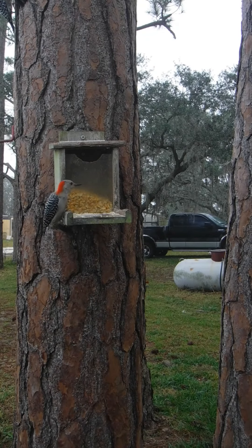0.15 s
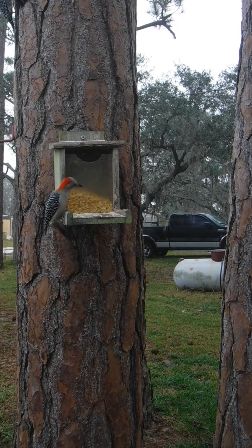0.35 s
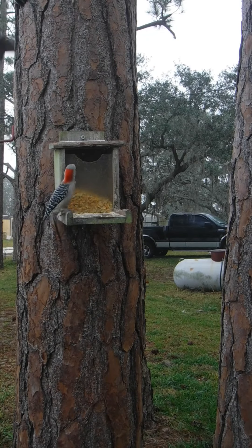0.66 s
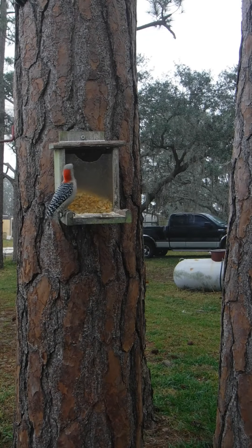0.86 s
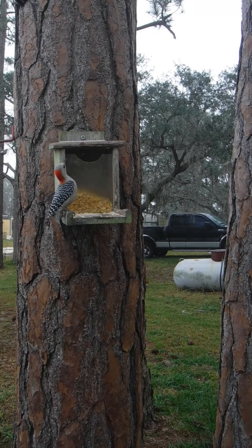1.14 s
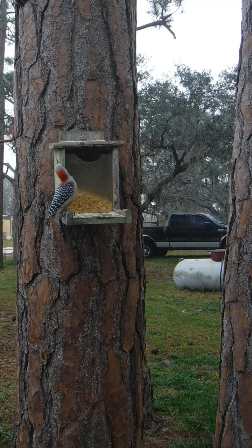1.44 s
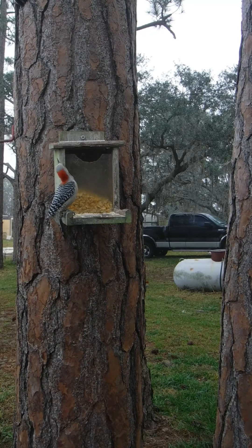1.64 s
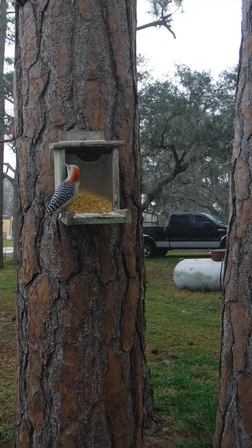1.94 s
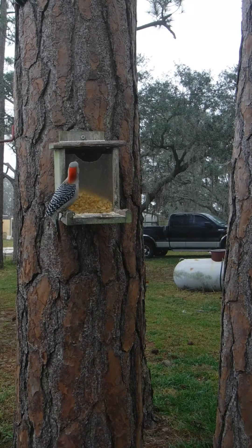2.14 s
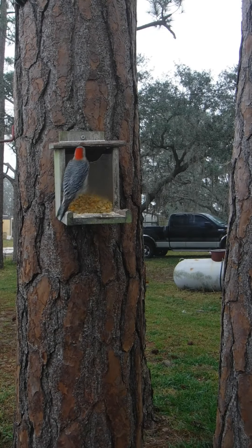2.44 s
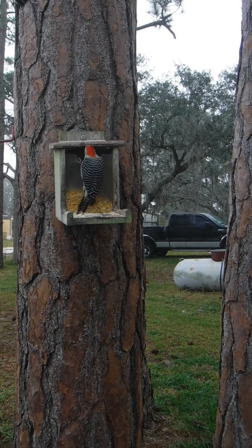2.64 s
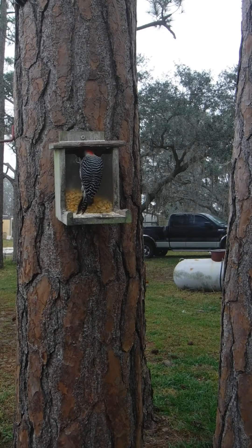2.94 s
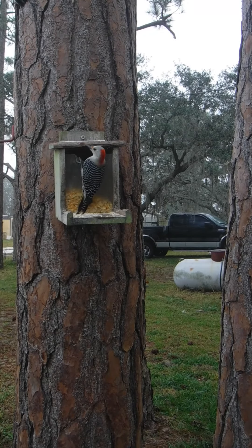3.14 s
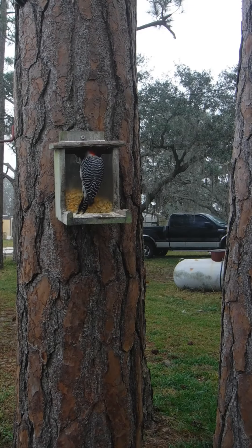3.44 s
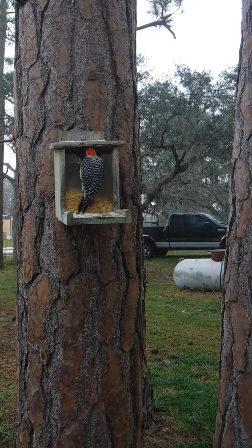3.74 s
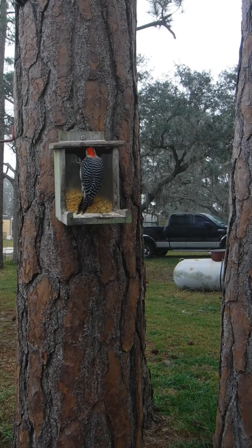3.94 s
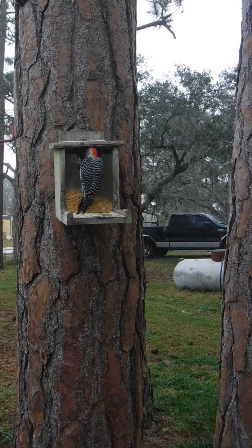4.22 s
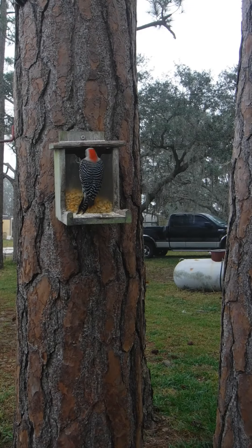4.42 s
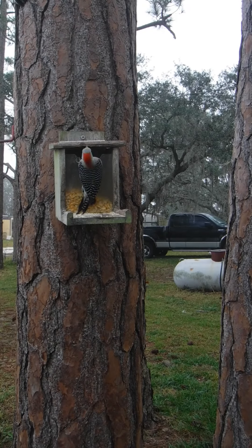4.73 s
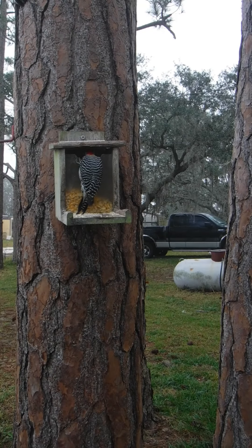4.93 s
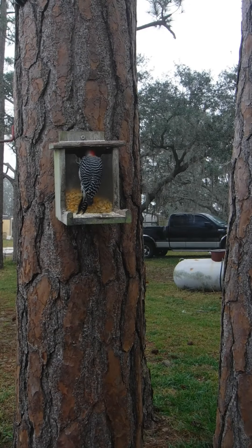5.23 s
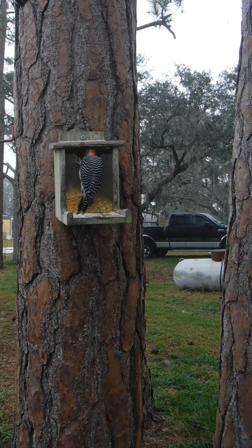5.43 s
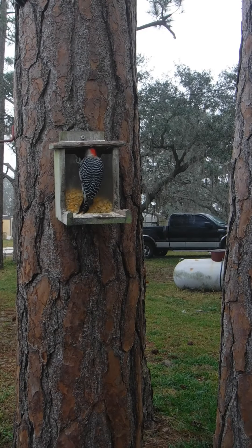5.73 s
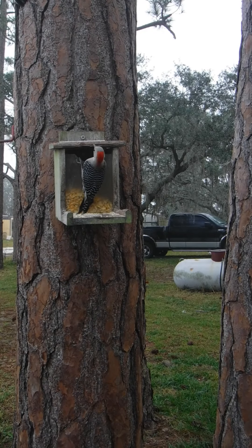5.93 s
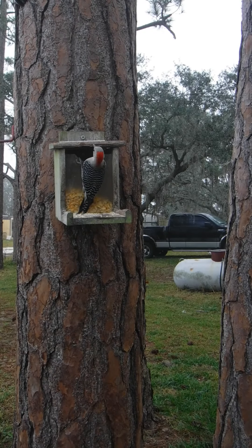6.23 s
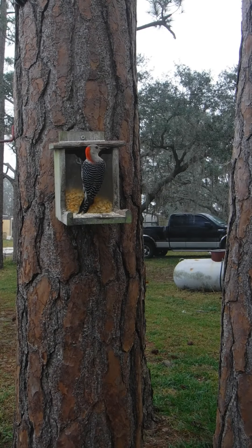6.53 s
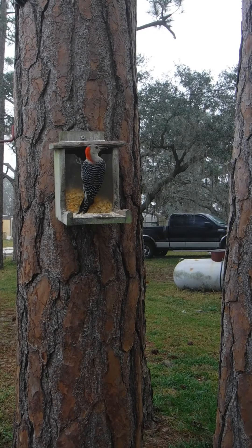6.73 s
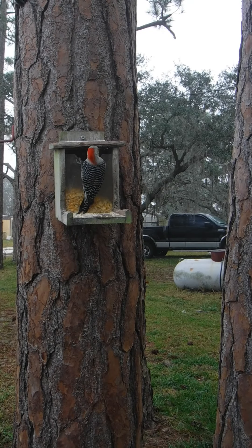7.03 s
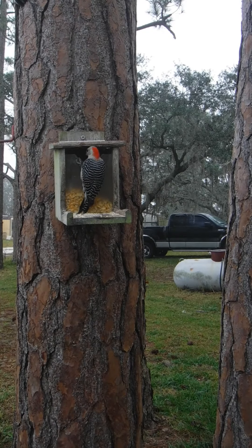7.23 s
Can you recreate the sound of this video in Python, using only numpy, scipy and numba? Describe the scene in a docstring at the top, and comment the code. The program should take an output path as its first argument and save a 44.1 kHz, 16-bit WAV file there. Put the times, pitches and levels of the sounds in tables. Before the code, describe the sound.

A woodpecker close by gives harsh, barking 'chah' calls in small groups, its claws ticking on a wooden feeder, with thin birdsong over quiet outdoor air.

```python
"""In a yard, a red-bellied woodpecker at a wooden feeder box on a pine, close to the microphone, gives eight 'chah'
calls: rough membrane pulses through throat and beak resonances, a bark that may whistle, then a low rattling growl.
Claws and beak tick on the wood: scratches of noise ring the box. Further off, a small bird sings thin falling 'seet'
notes with two gliding tones; faint slurred tones chirp in the trees and resonant noise makes far calls.
A machine hums in steady tones under the quiet air, which is shaped noise."""
import sys
import numpy as np
from scipy import signal
from scipy.fft import rfft, irfft
from scipy.io import wavfile
from scipy.ndimage import uniform_filter1d
from numba import njit

SR = 44100
rng = np.random.default_rng(int(sys.argv[2]) if len(sys.argv) > 2 else 0)


def log_audio(samples):
    """Write samples as a 16-bit WAV file to the path given in sys.argv[1]."""
    # one column per channel
    frames = np.atleast_2d(samples).T
    # limit to full scale, then quantise
    limited = np.clip(frames, -1, 1)
    pcm = np.round(limited * 32767).astype(np.int16)
    wavfile.write(sys.argv[1], SR, pcm)


N = 325017
TOP_HZ = 15800  # top of the microphone path and of the pulse trains


def undb(db):
    """Decibels to gain."""
    return 10 ** (np.asarray(db) / 20)


def unit(x):
    """Scale to rms 1."""
    return x / np.sqrt(np.mean(x ** 2) + 1e-20)


def steady(x, size=220):
    """Even out the loudness over a few milliseconds, to rms 1."""
    power = uniform_filter1d(uniform_filter1d(x ** 2, size), size // 2)
    return x / np.sqrt(np.abs(power) + 1e-14)


def walk(rate_hz, n):
    """Smooth random drift with a spread near 1, heading for a new value rate_hz times a second."""
    at = np.arange(n) / SR * rate_hz
    return 1.2 * np.interp(at, np.arange(4096), rng.standard_normal(4096))


def ramp(x):
    """Hold a control between 0 and 1."""
    return np.clip(x, 0, 1)


def bell(t, width_s):
    """A flat-topped window: 1 around t = 0, fallen to 1/e at its width."""
    return np.exp(-(t / width_s) ** 4)


def phase(hz):
    """Running phase in radians of a tone whose pitch moves."""
    return 2 * np.pi * np.cumsum(hz) / SR


@njit
def svf(x, hz, width):
    """State-variable band-pass whose centre and width move."""
    y, band_state, low_state = np.empty(len(x)), 0., 0.
    for i in range(len(x)):
        g = np.tan(np.pi * hz[i] / SR)
        damping = width[i] / hz[i]
        v = (band_state + g * (x[i] - low_state)) / (1 + g * (g + damping))
        band_state = 2 * v - band_state
        low_state += 2 * g * v
        y[i] = damping * v
    return y


def resonate(x, hz, width):
    """One resonance, gain 1 at its centre."""
    centre_hz = np.minimum(hz, SR * 9 / 20) * np.ones(len(x))
    return svf(x, centre_hz, width * np.ones(len(x)))


def steep(x, hz, width):
    """A resonance applied twice: dark valleys and a longer ring."""
    return resonate(resonate(x, hz, width), hz, width)


def ring(x, modes):
    """A bank of resonances sounding side by side."""
    return sum(undb(db) * resonate(x, hz, width) for hz, width, db in modes)


def band(x, lo_hz, hi_hz, order=3):
    """Band-pass with steep edges."""
    edges = [lo_hz, min(hi_hz, SR / 2 - 500)]
    return signal.sosfilt(signal.butter(order, edges, "band", fs=SR, output="sos"), x)


def add(out, start_s, x):
    """Mix a sound in at its time."""
    i = int(start_s * SR)
    out[i:i + len(x)] += x[:N - i]


def yard(level_db=-48.5, flicker_db=1.5):
    """Soft outdoor air, shaped noise; bands up to 2 kHz stir a little, the hiss above stays smooth."""
    # spectrum of the air: pitch_hz, relative density_db (per Hz)
    air_spectrum = [(15, -43), (25, -13.5), (62, -8), (91, -17.5), (122, -9.5), (140, -22.5), (152, -6),
                    (169, -6.5), (198, -10), (340, -7.5), (598, -14.5), (782, -14.5), (1380, -17),
                    (2630, -26.5), (15500, -34)]
    f = np.fft.rfftfreq(N, 1 / SR) + 1
    hz, db = np.transpose(air_spectrum)
    shape = undb(np.interp(np.log(f), np.log(hz), db))
    air = unit(irfft(rfft(rng.standard_normal(N)) * shape, N))
    for lo_hz, hi_hz in ((220, 750), (500, 600), (1000, 2000)):
        part = irfft(rfft(air) * ((f > lo_hz) & (f < hi_hz)), N)
        air = air + part * (undb(flicker_db * walk(6, N)) - 1)
    return undb(level_db) * air


def hum(drift_hz=1.63, whine_hz=13720, whine_db=-74):
    """Steady machine tones that waver on their way through the air, and a very faint high whine."""
    # tones of the distant machine: pitch_hz, level_db (rms), waver_db (spread; its sign only flips the drift)
    machine_tones = [(58.6, -80, 4.5), (127, -71.5, 3.5), (170.8, -55.5, 2.4), (342.6, -64, -3)]
    tones = np.zeros(N)
    for hz, db, waver_db in machine_tones:
        level = undb(db + waver_db * walk(14, N))
        tones += level * np.sin(phase(hz + drift_hz * walk(14, N)))
    whine = undb(whine_db) * np.sin(2 * np.pi * whine_hz * np.arange(N) / SR)
    return np.sqrt(2) * (tones + whine)


def far_calls(width_hz=170):
    """Another bird, very far off: hoarse calls of which only the strongest resonance carries this far."""
    # far calls: start_s, length_s, level_db (rms), pitch_hz
    distant_notes = [(4.234, 0.16, -60, 1380), (4.566, 0.13, -62, 1340), (4.951, 0.24, -66, 1370)]
    out = np.zeros(N)
    for start, length, db, hz in distant_notes:
        n = int(length * SR)
        hoarse = steep(rng.standard_normal(n), hz, width_hz)
        add(out, start, undb(db) * unit(np.sqrt(np.hanning(n)) * hoarse))
    return out


def chirps():
    """Faint chirps from the trees: quick slurs of a pure tone that swell and fade."""
    # chirps: start_s, length_s, start_hz, end_hz, level_db (the crest peaks 6 dB above it)
    slurs = [(3.083, 0.019, 5850, 4480, -58), (3.118, 0.02, 3260, 4130, -59),
             (3.243, .014, 5800, 4900, -61)]
    out = np.zeros(N)
    for start, length, start_hz, end_hz, db in slurs:
        n = int(length * SR)
        tone = np.sin(phase(np.linspace(start_hz, end_hz, n)))
        add(out, start, undb(db) * 2 * np.hanning(n) * tone)
    return out


def small_bird(upper_db=1.0, overtone_db=-19, undertone_db=-15, upper_scoop=0.38):
    """Two thin, hoarse whistles, one from each side of the syrinx, scoop up and glide down side by side."""
    # seet notes: start_s, length_s, rise_s (to the top), glide_s (half of the way down), lower_top_hz,
    # lower_end_hz, upper_top_hz, upper_end_hz (the ends are approached), level_db (lower voice, before the fade)
    seet_notes = [(2.566, 0.23, 0.013, 0.06, 7950, 6240, 9200, 8250, -49.5),
                  (4.139, 0.22, 0.035, 0.076, 8100, 6440, 9000, 8100, -41.5),
                  (4.598, 0.11, 0.0019, 0.0097, 8700, 7030, 9960, 7800, -50)]
    scoop_s, attack_s = 0.067, 0.006  # scoop_s: time to rise an octave to the top
    fade_depth_db, fade_shape = 14.5, 1.57
    waver, hoarse = 0.0065, 0.24  # random share of pitch and of amplitude
    out = np.zeros(N)
    for start, length, rise, glide, lower_top, lower_end, upper_top, upper_end, db in seet_notes:
        n = int(length * SR)
        t = np.arange(n) / SR
        scoop = (np.minimum(t - rise, 0) / scoop_s) ** 2
        height = 1 / (1 + (np.maximum(t - rise, 0) / glide) ** 2)
        lower_hz = (lower_end + height * (lower_top - lower_end)) * 2 ** -scoop
        upper_hz = (upper_end + height * (upper_top - upper_end)) * 2 ** (-upper_scoop * scoop)
        fade_db = -fade_depth_db * (t / length) ** fade_shape
        gate = ramp(np.minimum(t, length - t) / attack_s)
        lower = phase(lower_hz * (1 + waver * walk(1540, n)))
        upper = phase(upper_hz * (1 + waver * walk(1540, n)))
        # the upper voice drops out as the note softens
        upper_gain = undb(upper_db + 0.84 * fade_db + 3 * walk(110, n))
        voice = np.sin(lower) + upper_gain * np.sin(upper)
        # period doubling and tripling add faint partials above and below
        voice += undb(overtone_db) * np.sin(3 / 2 * lower)
        voice += undb(undertone_db) * np.sin(2 / 3 * upper)
        level = np.sqrt(2) * gate * undb(db + fade_db)
        add(out, start, level * voice * (1 + hoarse * walk(2900, n)))
    return out


def claws(size=4000):
    """Claws and beak on the box: each touch is a short gritty scratch that also knocks the wood."""
    # touches: start_s, tick_db (scratch before its band-pass), knock_db (15.5 dB is added below),
    # length_s (decay to 1/e)
    touches = [(0.251, -46, -54, 0.0035), (0.3694, -53, -49, 0.0026), (0.415, -49, -67, 0.0073),
               (2.438, -43, -50.5, 0.0035), (2.453, -38, -55, 0.0034), (2.46, -41.5, -66, 0.018),
               (2.498, -35, -60, 0.0029), (3.2557, -46, -55, 0.002)]
    # modes of the box: pitch_hz, width_hz, gain_db
    box_modes = [(860, 160, 14.5), (1530, 190, -6), (3300, 250, -3)]
    out = np.zeros(N)
    t = np.arange(size) / SR
    for start, tick_db, knock_db, length in touches:
        grit = undb(6.4 * walk(1350, size))
        scratch = rng.standard_normal(size) * grit * np.exp(-t / length)
        tick = undb(tick_db) * band(scratch, 5400, 13000, order=2)
        knock = undb(knock_db + 15.5) * ring(scratch, box_modes)
        add(out, start, tick + knock)
    return out


def pulses(cycle, hz, count=56):
    """Band-limited pulse train of rms 1, one pulse a cycle."""
    k = np.arange(1, count + 1)[:, None]
    return unit(np.sum((k * hz < TOP_HZ) * np.cos(2 * np.pi * k * cycle), axis=0))


def syrinx(hz, rough, whistle, jitter=0.0778, shimmer_db=4, hiss=1.0, whistle_jitter=0.039, second_side=2.2):
    """Uneven slaps of the membranes with a puff of air each; driven hard, they lock at three times the rate."""
    n = len(hz)
    # in rough stretches the second side of the syrinx joins in, out of step with the first
    cycle, other = (rng.random() + np.cumsum(hz * (1 + jitter * rough * walk(450, n))) / SR for _ in range(2))
    slaps = unit(pulses(cycle, hz) + second_side * rough * pulses(other, hz))
    slaps = slaps * undb(shimmer_db * rough * walk(492, n))
    air = unit(np.exp(-(cycle % 1)) * rng.standard_normal(n))
    rattle = unit(slaps + hiss * rough * air)
    locked_cycle = 3 * np.cumsum(hz * (1 + whistle_jitter * rough * walk(700, n))) / SR
    locked = pulses(locked_cycle, 3 * hz)
    return np.sqrt(1 - whistle) * rattle + np.sqrt(whistle) * locked


def call_level(t, swell_s, decay_s, length_s, release_s, bark_db, growl_db, depth_db):
    """Level in dB around the crest at t = 0: a bell-shaped bark, then a growl that holds and is released."""
    bark_shape, growl_attack_s, growl_release_db = 1.97, 0.012, 11
    side_s = np.where(t < 0, swell_s, decay_s)  # the bark is depth_db down this far from its crest
    bark = undb(bark_db - depth_db * np.abs(t / side_s) ** bark_shape)
    release = ramp(1 - (length_s - t) / release_s)
    growl = ramp(t / growl_attack_s) * undb(growl_db - growl_release_db * release)
    return 20 * np.log10(np.hypot(bark, growl) + 1e-9)


def call_pitch(t, middle_s, bark_hz, glide, growl_hz):
    """Pulse rate: an arch over the bark, then a break to the slowly sagging growl."""
    arch_s = 0.045  # the arch alone is an octave down here
    break_s, break_width_s, sag_octaves_per_s = 0.031, 0.00384, 1.84
    bark = bark_hz * 2 ** (glide * t - (t / arch_s) ** 2)
    growl = growl_hz * 2 ** (-sag_octaves_per_s * (t - middle_s))
    broken = (1 + np.tanh((t - break_s) / break_width_s)) / 2
    return bark + (growl - bark) * broken


def call_texture(t, bark_calm_s, growl_calm_s, bark_rough, growl_rough, bark_whistle, growl_whistle):
    """The syrinx settles near the crest and again in the growl, where it may lock into a whistle once more."""
    edge_rough = 0.692
    bark_half_s, growl_half_s, whistle_half_s = 0.0137, 0.0237, 0.018  # half-lengths
    in_bark = bell(t - bark_calm_s, bark_half_s)
    in_growl = bell(t - growl_calm_s, growl_half_s)
    rough = edge_rough + in_bark * (bark_rough - edge_rough) + in_growl * (growl_rough - edge_rough)
    whistle = bark_whistle * bell(t - bark_calm_s, whistle_half_s)
    whistle = whistle + growl_whistle * ramp(1 + (t - growl_calm_s) / growl_half_s)
    return ramp(rough), ramp(whistle)


def woodpecker(keynote_db=-10, shut_db=-14, fade_s=0.0022):
    """The throat opens with effort: the bark is bright, the growl moves to its own throat resonance."""
    # calls: crest_s (of the bark), swell_s (before it), decay_s (after it), length_s (after it),
    # release_s (of the growl), bark_db, growl_db, bark_treble_db, growl_treble_db, bark_rate_hz (pulses),
    # glide (octaves per s at the crest), growl_rate_hz (pulses), bark_rough, growl_rough (0-1),
    # bark_whistle, growl_whistle (share 0-1), bark_calm_s, growl_calm_s (calmest moments after the crest)
    chah_calls = [(0.275, 0.02, 0.027, 0.097, 0.012, -20, -38.5, -28, -54, 498, -6.5, 377, 0.38, 0.43, 0.17, 0, 0.0014, 0.062),
                  (0.562, 0.022, 0.022, 0.04, 0.017, -17, -28.5, -25.5, -37, 511.7, 0, 398, 0.42, 0.57, 0.06, 0.1, -0.004, 0.022),
                  (2.686, 0.021, 0.031, 0.107, 0.017, -23, -35.5, -33, -50.5, 483.3, -4, 527, 0.38, .12, 0.15, 0, 0.0018, 0.055),
                  (2.972, 0.023, 0.025, 0.1, .014, -19.5, -34.5, -25.5, -45.5, 568.6, -1.5, 558, 0.77, 0, 0.64, 0.12, -0.0021, 0.072),
                  (3.287, 0.024, 0.024, 0.12, 0.05, -18, -32.5, -22.5, -45.5, 612, -3.5, 499.5, 0.52, 0.34, 0.09, 0, 0.0016, .04),
                  (5.659, 0.024, 0.027, 0.093, 0.024, -16, -26.5, -20.5, -41, 499, -6, 483.6, 0.2, 0.85, 0.83, 0, .002, .06),
                  (6.001, 0.023, 0.027, 0.11, 0.015, -13.5, -29, -24, -48.5, 440, -5, 331.2, 0.17, 0.08, 0.93, .15, 0.0036, 0.052),
                  (6.336, 0.021, 0.026, 0.12, 0.026, -13, -31, -20.5, -48.5, 491, -8, 419.6, 0.27, 0.52, 0.64, 0.09, 0.0055, 0.057)]
    # throat in each call: bark_hz, growl_hz (resonance), bark_width_hz, growl_width_hz, lower_beak_hz,
    # lower_beak_db (gain before the beak's cut below), upper_beak_hz, windpipe_treble_db
    throat_shapes = [(2460, 2020, 910, 1170, 4840, 22, 9300, 16),
                     (2600, 2010, 1100, 1600, 4940, 13.5, 8330, -1.5),
                     (2350, 1700, 2500, 1600, 5000, -13, 8530, 1),
                     (1840, 1530, 970, 3800, 5580, 23, 7800, 5),
                     (1780, 1950, 670, 2200, 5100, 23.5, 8240, 8.5),
                     (2700, 1650, 920, 1640, 4270, 28.5, 8150, 12.5),
                     (2370, 2110, 740, 4100, 5400, 13, 8390, -2.5),
                     (2640, 2200, 430, 5800, 5500, 13, 8400, 1.5)]
    # lower resonances of the windpipe: pitch_hz, width_hz, gain_db
    windpipe_low = [(880, 300, -10), (1450, 300, -23), (3200, 500, -11)]
    # upper resonances of the windpipe: pitch_hz, width_hz, gain_db (each call's windpipe_treble_db is added)
    windpipe_high = [(7240, 780, -6.5), (9160, 1950, -9.5), (11600, 780, -11.5), (13800, 1100, -18)]
    bark_depth_db, treble_depth_db, treble_lead_s = 21.5, 29, 0.0041  # the treble leads
    out = np.zeros(N)
    for call, shape in zip(chah_calls, throat_shapes):
        (crest, swell, decay, length, release, bark_db, growl_db, bark_treble_db, growl_treble_db,
         bark_rate, glide, growl_rate, bark_rough, growl_rough, bark_lock, growl_lock, bark_calm, growl_calm) = call
        bark_hz, growl_hz, bark_width, growl_width, lower_hz, lower_db, upper_hz, pipe_db = shape
        t = np.arange(-2 * swell, length + fade_s, 1 / SR)
        gate = ramp(np.minimum(t - t[0], t[-1] - t) / fade_s)
        db = call_level(t, swell, decay, length, release, bark_db, growl_db, bark_depth_db)
        treble_db = call_level(t + treble_lead_s, swell, decay, length + treble_lead_s, release,
                               bark_treble_db, growl_treble_db, treble_depth_db)
        hz = call_pitch(t, growl_calm, bark_rate, glide, growl_rate)
        rough, whistle = call_texture(t, bark_calm, growl_calm, bark_rough, growl_rough, bark_lock, growl_lock)
        source = syrinx(hz, rough, whistle)
        effort = ramp(1 + (db - db.max()) / 14)
        # the throat keeps toward its bark width while the whistle lasts; its centre pitch follows effort
        width = growl_width + np.maximum(effort, whistle) * (bark_width - growl_width)
        throat = steep(source, growl_hz + effort * (bark_hz - growl_hz), width)
        # the locked membrane radiates its own keynote; the rattle rings the windpipe
        keynote = undb(keynote_db) * whistle * steep(source, 3 * hz, 1360)
        windpipe = (1 - whistle) * ring(source, windpipe_low)
        body = band(throat + keynote + windpipe, 672, 3040, order=5)
        # the beak is wide open at the start of the call and closes as the bark dies
        gape = np.maximum(effort, t < 0)
        body = body + undb(-14.5) * gape * steep(source, 3700, 1800)
        # the lower beak resonance is cut by shut_db when open, twice that when shut
        lower_beak = undb(lower_db + shut_db * (2 - gape)) * steep(source, lower_hz, 800)
        upper_beak = steep(source, upper_hz, 1330)
        pipe_treble = undb(pipe_db) * band(ring(source, windpipe_high), 4030, 14400)
        treble = lower_beak + upper_beak + pipe_treble
        voice = undb(db) * steady(body) + undb(treble_db) * steady(treble)
        add(out, crest + t[0], gate * voice)
    return out


def trees(x, t60_s, db, size=26000):
    """Scattered echoes from trunks and foliage: a noise tail that builds up, then dies by 60 dB in t60_s."""
    t = np.arange(size) / SR
    tail = rng.standard_normal(size) * undb(-60 * t / t60_s) * (1 - np.exp(-t / 0.047))
    return undb(db) * signal.fftconvolve(x, tail / np.linalg.norm(tail))[:N]


def scene():
    """The near bird is almost dry; the far ones carry more echo."""
    far = far_calls() + chirps() + small_bird()
    near = claws() + woodpecker()
    far = far + trees(far, t60_s=0.45, db=-10)
    near = near + trees(near, t60_s=0.3, db=-26)
    return (yard() + hum() + far + near)[None]


def record(dry):
    """The microphone path cuts the top steeply."""
    return signal.sosfilt(signal.ellip(10, .2, 70, TOP_HZ, fs=SR, output="sos"), dry)


dry = scene()
out = record(dry)
log_audio(out)
```